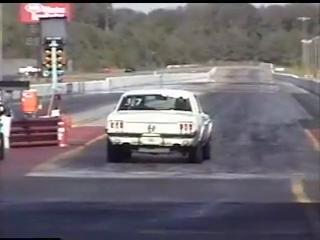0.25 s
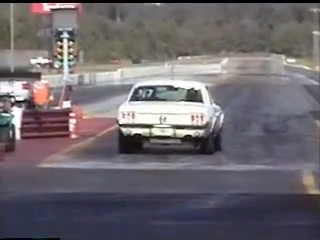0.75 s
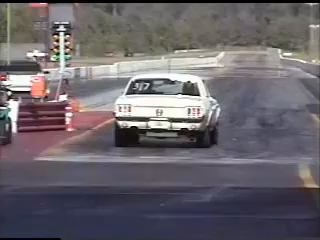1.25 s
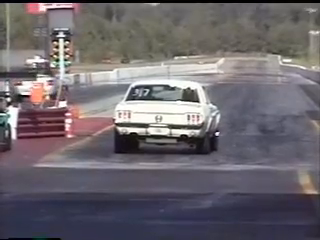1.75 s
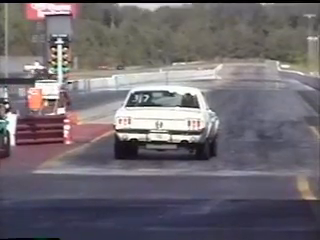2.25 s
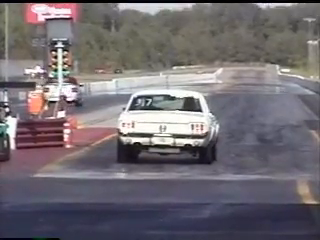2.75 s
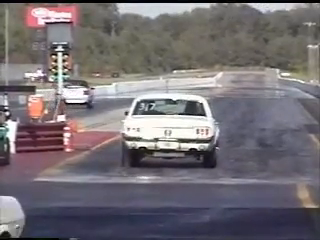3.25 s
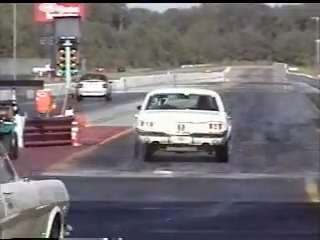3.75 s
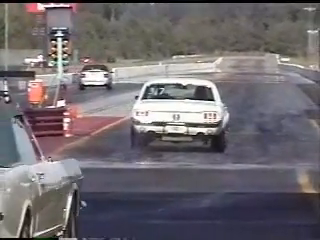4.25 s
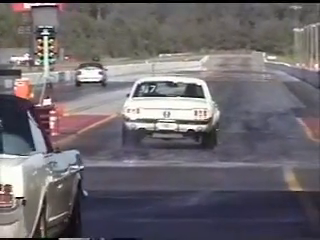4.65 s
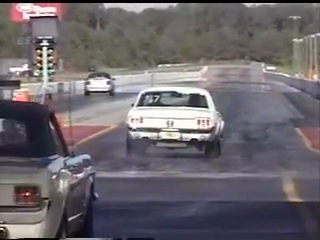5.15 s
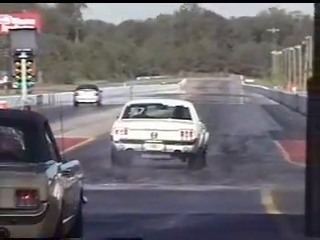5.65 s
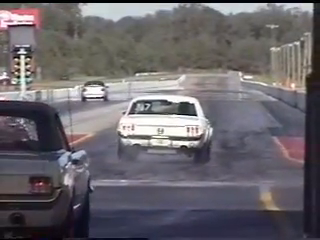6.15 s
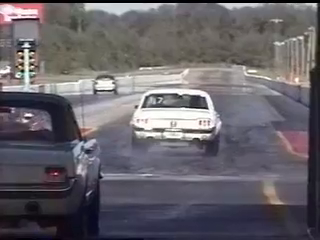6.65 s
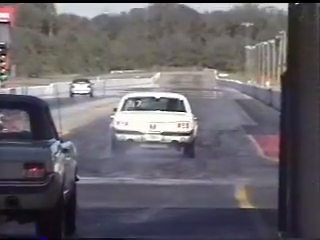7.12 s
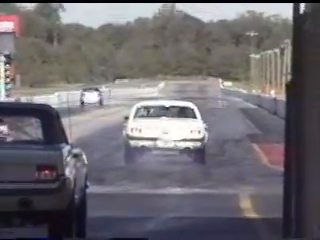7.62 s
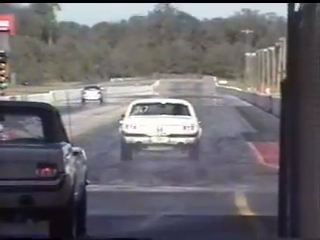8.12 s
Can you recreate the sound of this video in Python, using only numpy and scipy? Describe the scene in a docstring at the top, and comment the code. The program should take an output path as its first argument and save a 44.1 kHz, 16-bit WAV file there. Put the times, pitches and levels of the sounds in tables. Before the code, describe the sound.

Outdoors at a drag strip, a V8 growls steadily while a car in the next lane drones away, its note dropping at a gear change. Near two seconds the rear tyres chirp and burst into a loud, piercing squeal with rapid pitch flutters, buzzing chatter and gritty hiss. It mellows midway, darkens as the car rolls, then fades near eight seconds, leaving the engine. Heard from behind, almost central, with scattered echoes and slightly dull, compressed treble.

```python
"""A V8 car does a burnout at a drag strip, between walls that scatter the sound, for about eight seconds. Eight
unequal firings a cycle ring its exhaust throughout; a car in the next lane drones off and changes gear. At 1.9
s the rear tyres break loose with a chirp, then squeal by sticking and slipping about 1000 times a second. The
pitch lifts most strongly once a wheel turn; tread chatter, rubber hiss and a low rumble join in. From 4 s the
hot rubber mellows, at 6.6 s the car rolls and the chatter turns to a higher rasp, and near 7.8 s the tyres
grip."""
import sys
import numpy as np
from scipy import signal
from scipy.fft import rfft, irfft, next_fast_len
from scipy.io import wavfile
from scipy.ndimage import uniform_filter1d

SR = 44100
rng = np.random.default_rng(int(sys.argv[2]) if len(sys.argv) > 2 else 0)


def generate_wav(sig):
    """Save sig (samples, or channels by samples) to the path in sys.argv[1] as 16-bit PCM at SR."""
    pcm = np.round(np.clip(np.atleast_2d(sig).T, -1, 1) * 32767).astype(np.int16)
    wavfile.write(sys.argv[1], SR, pcm)


N = 369558
TIME = np.arange(N) / SR  # s

# Basic stick-slip rate of the tread. Each row: time in seconds, rate in Hz.
SLIP_RATE = [(2.1, 1020), (2.25, 1030), (2.42, 994.4), (3.1, 1092), (3.6, 1077), (3.9, 1028), (4.5, 1011),
             (5.3, 1066), (6.4, 988.7), (6.82, 934), (7.1, 965.6), (7.38, 982.5), (7.76, 901), (8.0, 914)]
CHIRP_S = 1.895  # the tyres break loose
SPIN_S = 2.03  # the wheels spin up


def gain_of(db):
    """Decibels to amplitude."""
    return 10 ** (np.asarray(db) / 20)


def evened(x):
    """Scales to rms 1."""
    return x / np.sqrt(np.mean(x ** 2) + 1e-20)


def curves(rows):
    """Each column of a table, joined by straight lines in time."""
    s, *columns = np.transpose(rows)
    return [np.interp(TIME, s, c) for c in columns]


def read(points, hz):
    """A spectrum, joined by straight lines over log frequency."""
    f, value = np.transpose(points)
    return np.interp(np.log(hz + 1), np.log(f + 1), value)


def filtered(x, response):
    """Applies a gain given as a function of frequency."""
    size = next_fast_len(N + SR // 4)
    return irfft(rfft(x, size) * response(np.fft.rfftfreq(size, 1 / SR)), size)[..., :N]


def coloured(x, points):
    """Shapes x with a gain curve in dB, then scales it to rms 1."""
    return evened(filtered(x, lambda f: gain_of(read(points, f))))


def wander(rate_hz):
    """Random motion of rms 1, up to about this rate."""
    lowpass = signal.butter(2, min(rate_hz, SR / 4), fs=SR, output="sos")
    return evened(signal.sosfilt(lowpass, rng.standard_normal(N)))


def phase_of(hz):
    """Running phase of a frequency curve."""
    return 2 * np.pi * np.cumsum(hz) / SR


def change(at_s, over_s):
    """A smooth passage from 0 to 1 around a moment."""
    return .5 + .5 * np.tanh((TIME - at_s) / (2 * over_s))


def bump(at_s, width_s):
    """A smooth swell of height 1 around a moment."""
    return np.exp(-((TIME - at_s) / width_s) ** 2)


def tyre(detune, lag_turns, flutter_db, rasp, fuzz):
    """One tread in stick-slip, as a rotating phasor; more grip lifts the pitch and thins the fundamental."""
    # Swing of the fundamental before choking and flutter. Each row: time in seconds, level in dB.
    swing_curve = [(1.94, -23), (2.01, -15), (2.8, -12.5), (3.05, -15.5), (3.75, -16.5), (4.05, -11.5),
                   (4.8, -13.5), (4.98, -21.5), (5.7, -21), (6.0, -17.5), (6.9, -18.5), (7.3, -16.5),
                   (7.8, -18.5), (8.0, -19.5)]
    # Upper harmonics of the slip. Each row: multiple of the slip rate, level before the bite in dB.
    overtones = [(3, -21), (4, -18), (5, -20)]
    (slip_hz, turns, lift), (tone_db,) = wheel(), curves(swing_curve)
    rise = lift * grip(turns - lag_turns)

    # a wide swing of the tread steadies its pitch: 0.25 dB less jitter for each dB of swing
    steadying = gain_of(0.25 * (-18 - tone_db))
    jitter = .023 * (0.2997 + .7 * unrest()) * steadying
    unsteady = jitter * (.7 * wander(45) + rasp * wander(300))
    phase = phase_of(slip_hz * (1 + detune + 1.35 * rise - .2 * lift + unsteady))

    # parts of the contact patch slip out of step, which frays the tone and now and then chokes it
    frayed = 1 + fuzz * (wander(39) + 1j * wander(64))
    choke_db = 126 * rise + 5 * np.maximum(wander(40) - .4, 0)
    # the tread can only swing so far
    swing_db = np.minimum(tone_db - choke_db + flutter_db * wander(49.55), -13)
    tone = gain_of(swing_db + 1.5) * frayed * np.exp(1j * phase)

    # the sharp edge of each slip comes a little early or late, which smears the upper harmonics
    phase = phase + .13 * wander(260)
    # the upper harmonics bite hardest at first, and when the pitch is low
    early_bite_db = 8 * np.exp(-np.maximum(TIME - SPIN_S, 0) / 0.39)
    low_pitch_db = -0.0353 * (curves(SLIP_RATE)[0] - 915)
    upper = sum(gain_of(db) * np.exp(1j * k * phase) for k, db in overtones)
    edge = gain_of(1.77) * np.exp(2j * phase) + gain_of(early_bite_db + low_pitch_db) * upper
    # the octave weakens with heat; each lift of pitch feeds it
    octave_db = heated(-19.5, -30) + patches_db()[0]
    edge_db = octave_db + 20 * rise + 2.0 * wander(94)
    return np.sqrt(2) * (tone + gain_of(edge_db) * edge)


def wheel():
    """Slip rate in Hz, wheel turns completed, and the depth of the pitch lift that each turn brings."""
    chirp_hz, drop_s = 244.7, .16  # the chirp stands this far above the squeal and drops into it
    slip_hz = curves(SLIP_RATE)[0] + chirp_hz * np.clip(1 - (TIME - CHIRP_S) / drop_s, 0, 2)
    # the wheels spin up to a steady speed, falling a few turns behind on the way
    turns_per_s, spin_up_s, turns_behind = 6.4, .7, 1.8
    spun_s = TIME - SPIN_S
    turns = turns_per_s * spun_s - turns_behind * np.tanh(spun_s / spin_up_s)
    # the lift shrinks once the tread has worn even
    fresh, worn = .1, .028
    return slip_hz, turns, unrest() * (fresh + (worn - fresh) * change(4.7, .4))


def grip(turns):
    """Grip of the tread round the wheel: one strong patch between two weaker ones."""
    patches = [(0, 1, 14), (1 / 3, .55, 36), (-1 / 3, .4, 36)]  # (place in turns, height, sharpness)
    return sum(height * np.cos(np.pi * (turns + place)) ** sharpness for place, height, sharpness in patches)


def unrest(build_s=0.058):
    """The tread slips evenly at first and grows restless as the wheels spin up: 0 to 1."""
    return change(SPIN_S, build_s)


def heated(cold_db, hot_db):
    """A level that passes from its cold to its hot value as the rubber warms and softens."""
    return cold_db + (hot_db - cold_db) * change(4.04, 0.28)


def patches_db():
    """What the patches of track add to the octave, the chatter and the scrubbing."""
    # Patches of track that recolour the squeal. Each row: middle in seconds, half width in seconds,
    # change of the octave in dB, of the chatter in dB, of the scrubbing in dB.
    track = [(5.03, .1, -0.5, -5, -3), (5.9, 0.24, 4, -1.5, 0), (7.17, 0.11, 5.5, -11, 2),
             (7.85, 0.085, 6.5, 5, -2)]
    return sum(np.outer(dbs, bump(s, width)) for s, width, *dbs in track)


def sliding():
    """1 while the tyres slide, 0 while they grip; a short chirp comes first."""
    slide_s, attack_s, ease_s, release_s = 1.923, 0.072, 7.801, 0.18
    attack = np.clip((TIME - slide_s) / attack_s, 0, 1)
    release = np.where(TIME < ease_s, 1, bump(ease_s, release_s))
    return gain_of(-7.5) * bump(CHIRP_S, 0.024) + attack * release


def chatter():
    """Tread blocks buzz roughly above the main squeal and follow its pitch."""
    # Tread blocks with rates of their own. Each row: multiple of the slip rate, relative level in dB,
    # rms pitch jitter as a share, change of level once the car rolls forward in dB.
    blocks = [(1.66, -2.5, .04, -4.5), (1.86, -2.5, 0.061, -6.5), (2.6, -1, 0.018, -8.5),
              (2.75, -8, .03, -5), (3.35, -25.5, .035, 14), (3.62, -13.5, 0.032, -2.5)]
    slip_hz, turns, lift = wheel()
    hz = slip_hz * (1 + .7 * lift * grip(turns))
    rolling = change(6.61, 0.074)
    buzz = np.zeros(N)
    for multiple, db, jitter, roll_db in blocks:
        rough = 1 + 1.08 * wander(110.0)
        phase = phase_of(multiple * hz * (1 + jitter * wander(180.13)))
        buzz += gain_of(db + roll_db * rolling) * rough * np.sin(phase)
    level_db = heated(-30, -30) + patches_db()[1]  # heat leaves it alone
    return np.sqrt(2) * unrest() * gain_of(level_db) * buzz


def scrub(first_db=-5):
    """Gritty hiss of rubber tearing over asphalt, softer until the wheels spin up."""
    # Colour of the tearing rubber. Each row: frequency in Hz, relative level in dB.
    hiss_colour = [(110, -29), (300, -4.5), (550, 3), (800, 2.5), (1300, 2), (2900, 7.5), (3500, -7.5),
                   (4400, -2.5), (5400, -4.5), (6800, -5.5), (7700, -18), (10300, -11.5), (12000, -14.5)]
    hiss = coloured(rng.standard_normal(N) * gain_of(1.55 * wander(150)), hiss_colour)
    return gain_of(heated(-23, -26.5) + patches_db()[2] + first_db * (1 - unrest())) * hiss


def sheen(squeal):
    """Faint high tones at fixed distances above the squeal, strongest over its upper harmonics."""
    # Thin tones that rise and fall with the squeal. Each row: distance above it in Hz, gain in dB.
    shifts = [(3900, -12.5), (7800, -17.5)]
    bright = np.diff(squeal, prepend=0)
    return sum(gain_of(db) * bright * np.exp(2j * np.pi * hz * TIME) for hz, db in shifts).real


def engine(pulse_db=-29, uneven_db=0.5):
    """Eight unequal firings a cycle, each a pulse and a puff of gas, ring the exhaust pipes."""
    # Engine speed. Each row: time in seconds, firings a second.
    firing_curve = [(0, 270), (1.1, 249), (1.5, 220), (1.9, 256), (2.4, 252), (3.3, 267), (3.7, 259),
                    (4.9, 264), (5.5, 250), (6.65, 244), (7.3, 270), (8.38, 237)]
    # Exhaust level, which drops as the squeal comes in. Each row: time in seconds, level in dB.
    exhaust_level = [(0.0, -27), (1.0, -27), (1.61, -30), (1.96, -25.5), (2.1, -34), (2.15, -31.5),
                     (5.14, -36.5), (5.16, -32.5), (6.44, -32.5), (6.96, -25.5), (7.79, -29.5), (8.38, -29.5)]
    # Strength of each cylinder in dB, in firing order.
    cylinders = [-3.5, -4, -2.5, -2.5, -2, -3.5, -3.5, -2]
    # Pipe resonances. Each row: centre in Hz, width in Hz, lift in dB.
    pipes = [(342, 190, -1), (579, 11, -1.5), (988, 290, 7.5), (1960, 110, 4.5), (2520, 230, 6)]
    # Colour of the exhaust roar. Each row: frequency in Hz, relative level in dB.
    roar_colour = [(130, -37.5), (220, -12), (292, -5.5), (363, -1.5), (423, -2), (525, 1.5), (746, -5),
                   (1170, -9.5), (1320, -10.5), (2000, -10.5), (2250, -14.5), (2710, -14.5), (3250, -18),
                   (3720, -17.5), (12000, -35), (15600, -76), (22000, -120)]
    # Colour of the low boom. Each row: frequency in Hz, relative level in dB.
    boom_colour = [(20, -57), (100, -21), (125, -8), (185, -3.5), (240, -2.5), (290, -4), (450, -8),
                   (2000, -83)]
    (firing_hz,), (level_db,) = curves(firing_curve), curves(exhaust_level)
    fired = np.cumsum(firing_hz * (1 + 0.00887 * wander(9.14))) / SR
    count = fired.astype(int)
    strength = gain_of(np.take(cylinders, count % len(cylinders)) + uneven_db * wander(88))

    clicks = np.diff(count, prepend=0) * strength
    pulses = evened(filtered(clicks, lambda f: (f > 10) / (1 + (f / 1300) ** 2)))
    puffs = evened(strength * (5.8 + np.exp(-(fired % 1) / 1.3)) * rng.standard_normal(N))
    gas = gain_of(pulse_db) * pulses + puffs

    def resonance(f):
        return gain_of(sum(db / (1 + (2 * (f - hz) / width) ** 2) for hz, width, db in pipes))

    roar = gain_of(0.57) * coloured(filtered(gas, resonance), roar_colour)
    boom = gain_of(-12.0) * coloured(gas, boom_colour)
    # the pipes favour twice the firing rate, which stands out as a note
    note = gain_of(-19 + 7.1 * wander(7.1)) * np.sin(2 * np.pi * 2 * fired)
    return gain_of(level_db) * (roar + boom + note)


def next_lane():
    """A second car drones off, its note sagging as it changes gear."""
    # Its exhaust note. Each row: time in seconds, pitch in Hz, level in dB.
    drone = [(0, 383, -28.5), (.35, 383, -36.5), (.6, 352, -31), (1.08, 351, -33.5), (1.5, 264.3, -37),
             (1.8, 233, -73)]
    hz, db = curves(drone)
    phase = phase_of(hz * (1 + 0.0045 * wander(24)))
    waver_db = 2 * wander(15)
    return gain_of(db + waver_db) * (np.sin(phase) + 0.55 * np.sin(phase * 3 / 2) + 0.29 * np.sin(2 * phase))


def pulls(fade_s=0.21, climb_hz_per_s=120):
    """The second car's note climbs as it pulls through each gear."""
    # Pulls in gear. Each row: start in seconds, length in seconds, first pitch in Hz, level in dB.
    gears = [(.6, .65, 486, -41), (2.5, 0.58, 503, -44), (4.0, .77, 504.3, -37.5)]
    out = np.zeros(N)
    for start, length, hz, db in gears:
        held = np.clip(np.minimum(TIME - start, start + length - TIME) / fade_s, 0, 1)
        out += gain_of(db) * held * np.sin(phase_of(hz + climb_hz_per_s * (TIME - start)))
    return out * gain_of(2.2 * wander(14))


def rumble():
    """A faint, lumpy low rumble that swells during the burnout."""
    # Colour of the rumble. Each row: frequency in Hz, relative level in dB.
    low_colour = [(15, 6.5), (100, -2.5), (250, -12), (1000, -68)]
    rest_db, top_db, sag_db_per_s, end_s = -73, -47, 1.5, 6.85
    burnout = unrest() * (1 - change(end_s, .15)) * gain_of(top_db - sag_db_per_s * (TIME - SPIN_S))
    lumpy = rng.standard_normal(N) * gain_of(4.6 * wander(13.4))
    return (gain_of(rest_db) + burnout) * coloured(lumpy, low_colour)


def walls(x):
    """Sparse echoes of random sign from barriers and stands, the high treble dying first."""
    # Decay between the walls. Each row: frequency in Hz, time to fall by 60 dB in seconds.
    decay = [(100, 0.53), (1000, 1), (3000, 0.66), (10000, 0.1)]
    taps = rng.choice([-1., 1.], SR // 2) * (rng.random(SR // 2) < 1500 / SR)  # about 1500 echoes a second
    hz, t, z = signal.stft(taps, SR, nperseg=256)
    fading = gain_of(-60 * t / read(decay, hz)[:, None])
    tail = signal.istft(z * fading, SR, nperseg=256)[1]
    return np.std(x) * evened(signal.fftconvolve(x, tail)[:N])


def scene():
    """Two tyres and the exhaust near the middle, leaning a little left; scattered sound gives the width."""
    # How well the tyre radiates the squeal. Each row: frequency in Hz, gain in dB.
    carcass = [(2400, 0.5), (3050, 6), (3550, -6), (4200, 2), (4750, -15)]
    # Width of the echoes. Each row: frequency in Hz, gain into the side signal in dB.
    spread = [(40, 1), (80, -14), (180, -13), (1000, -11.5), (2000, -15), (3200, -11), (3800, -7),
              (4600, -58)]
    # Lean to the left. Each row: frequency in Hz, share of the middle added left and taken from the right.
    lean = [(50, 0), (150, 0.058), (1100, 0.098), (2000, 0)]
    near_tyre = tyre(detune=-.003, lag_turns=0., flutter_db=1.4, rasp=.8, fuzz=.16)
    far_tyre = tyre(detune=.005, lag_turns=0.061, flutter_db=6.0, rasp=1.692, fuzz=0.6)
    squeal = gain_of(-1.3) * near_tyre + gain_of(-7.0) * far_tyre
    radiated = filtered(squeal.real, lambda f: gain_of(read(carcass, f)))
    rubber = radiated + sheen(squeal) + chatter() + scrub()
    direct = gain_of(2.0) * sliding() * rubber + engine() + next_lane() + pulls() + rumble()
    mid = direct + gain_of(-8.5) * walls(direct)
    scattered = filtered(walls(direct), lambda f: gain_of(read(spread, f)))
    side = scattered + filtered(mid, lambda f: read(lean, f))
    return np.array([mid + side, mid - side])


def record(dry, ceiling_db=-9, knee=1.21, edge_hz=11850):
    """A fast limiter flattens the loudest swells, stray peaks are rounded off; then the treble is cut."""
    # two 5 ms averages follow the power of both channels together
    power = abs(uniform_filter1d(uniform_filter1d((dry ** 2).mean(0), size=220), size=220))
    limited = dry / (1 + (power / gain_of(ceiling_db) ** 2) ** knee) ** (.5 / knee)
    rounded = limited / (1 + (limited / .82) ** 8) ** (1 / 8)
    lowpass = signal.firwin(511, edge_hz, window=("kaiser", 9), fs=SR)
    return signal.oaconvolve(rounded, lowpass[None], "same")


dry = scene()
out = record(dry)
generate_wav(out)
```